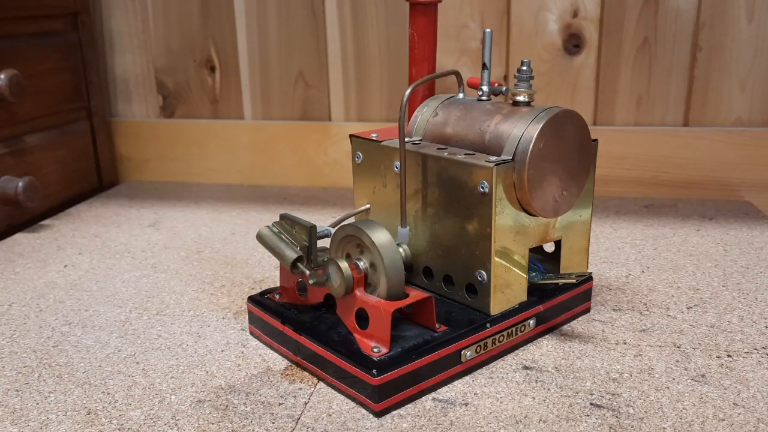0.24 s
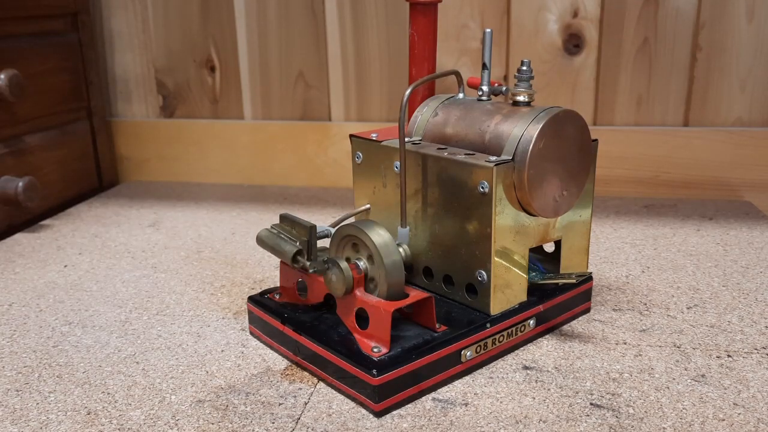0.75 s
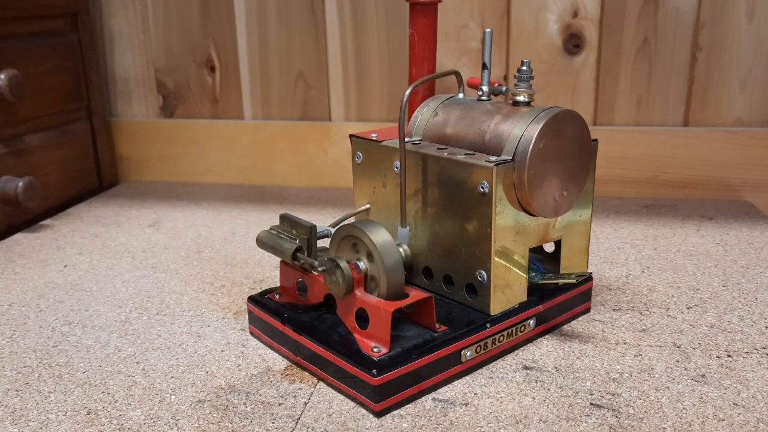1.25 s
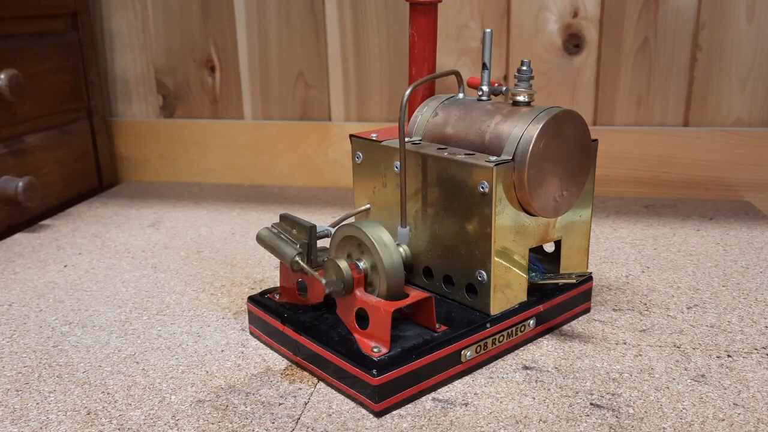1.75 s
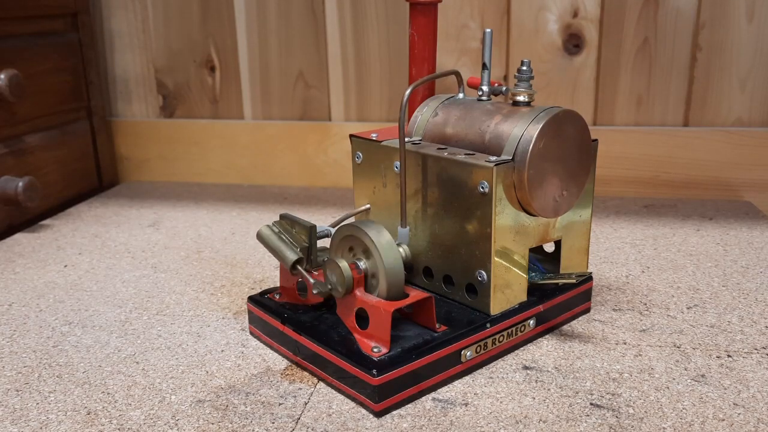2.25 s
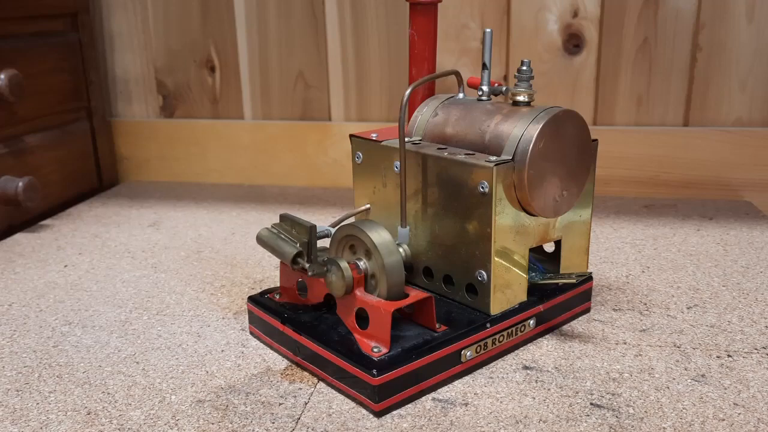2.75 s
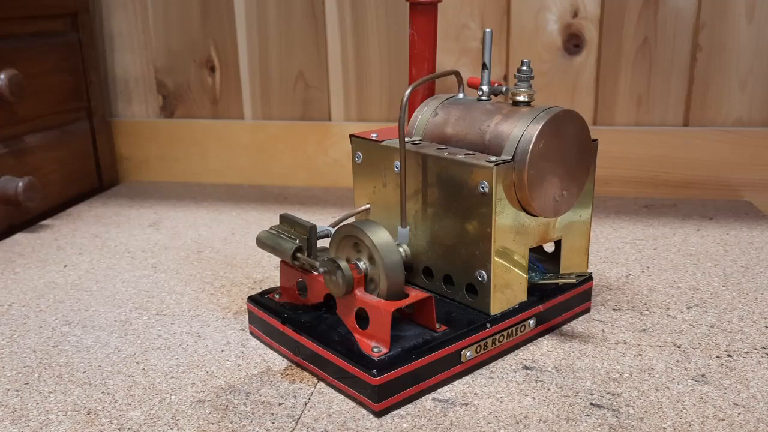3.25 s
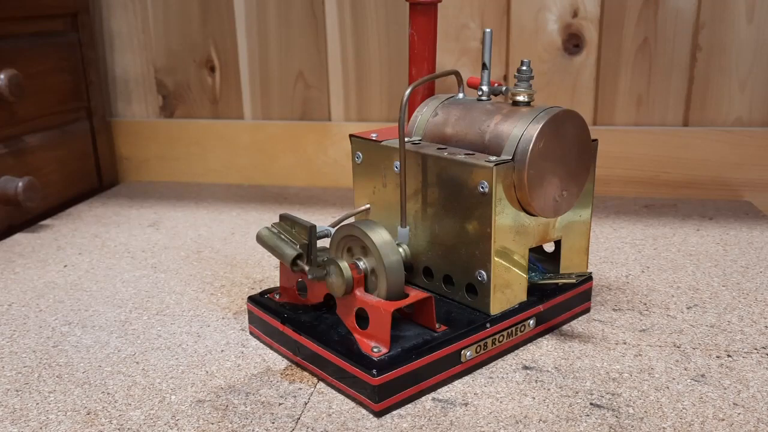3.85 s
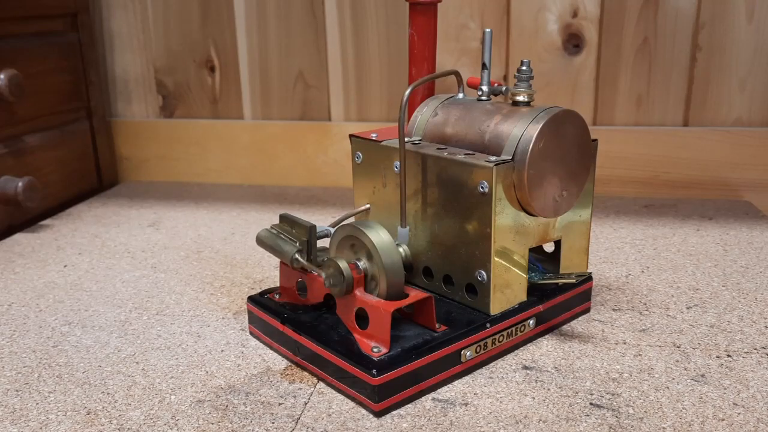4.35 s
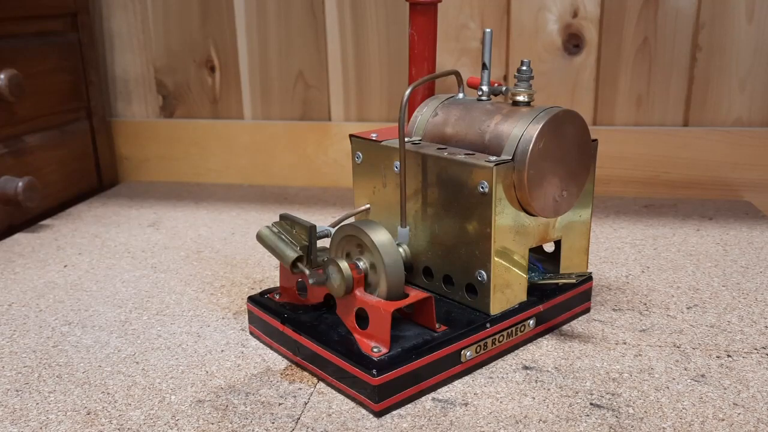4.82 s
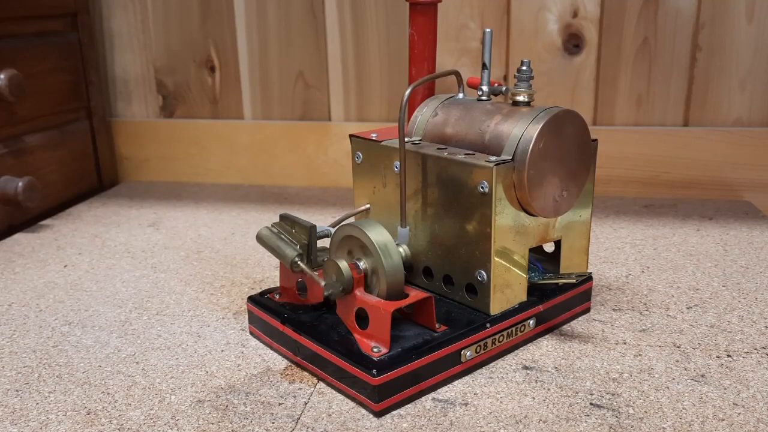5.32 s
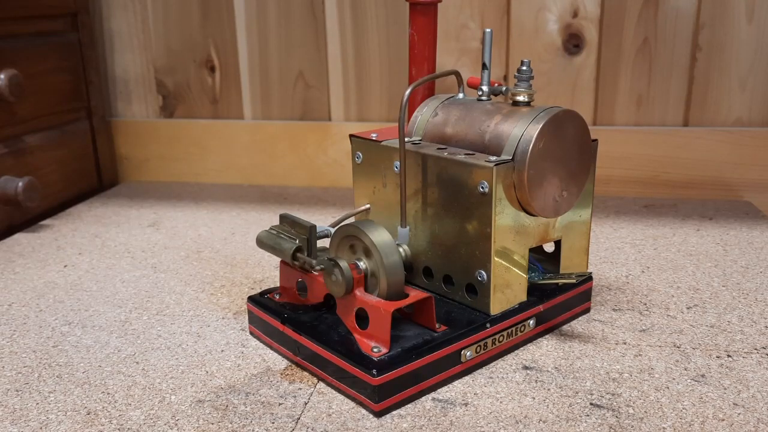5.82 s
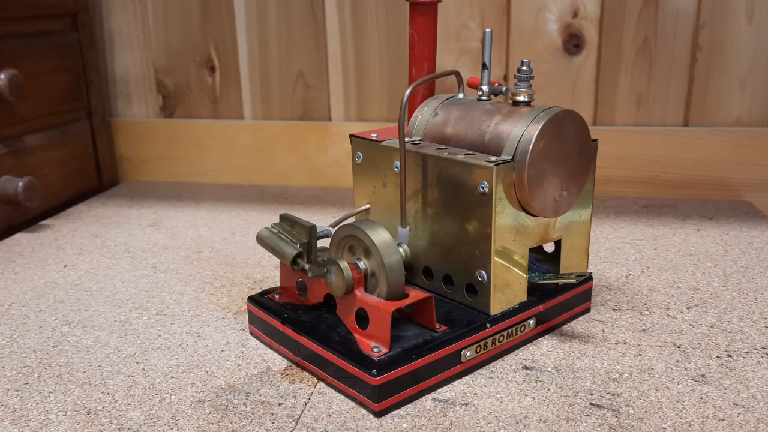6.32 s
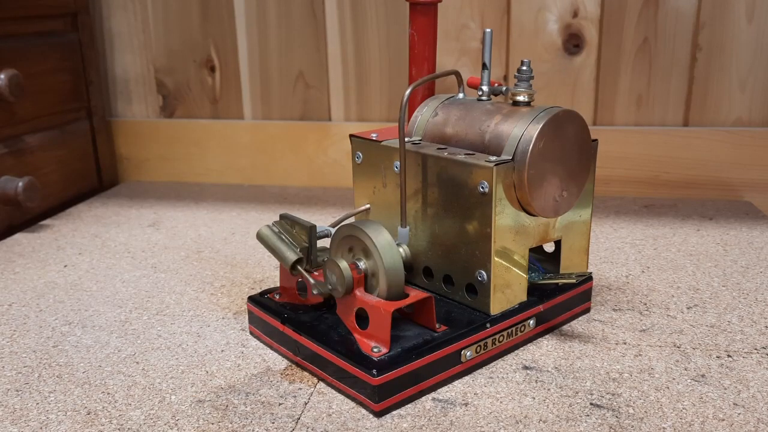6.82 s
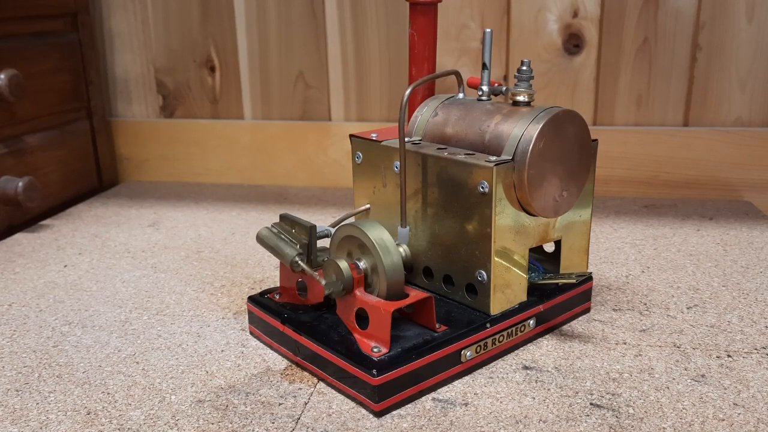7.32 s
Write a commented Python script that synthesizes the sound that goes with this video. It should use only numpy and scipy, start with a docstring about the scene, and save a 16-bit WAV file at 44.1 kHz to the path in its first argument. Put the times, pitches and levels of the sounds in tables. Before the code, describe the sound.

A toy steam engine on a wooden workbench, heard close in a small room. A brief steam rush opens, then soft puffs, a rising breathy whistle and a wet treble spit repeat each turn, from about two to nearly four turns per second. Sizzle, simmering bubbles, dull thumps and irregular sharp pops continue throughout, leaning left in stereo.

```python
"""On a workbench: a toy steam engine warms up and turns over slowly, gathering speed.
Each turn, steam puffs twice through the exhaust pipe (noise through pipe modes), a leak at the rocking
cylinder sings upward (noise around a gliding pitch) and a wet spit follows (treble noise).
Water drops pop on hot metal (noise bursts through body modes), the boiler sizzles and simmers (random
grains, ringing bubbles, dull thumps) and the burner flutters below (low noise)."""
import sys
import numpy as np
from scipy import signal
from scipy.fft import rfft, irfft, next_fast_len
from scipy.io import wavfile
from scipy.ndimage import map_coordinates

SR = 44100
rng = np.random.default_rng(int(sys.argv[2]) if len(sys.argv) > 2 else 0)


def inscribe(sig):
    """Save sig as 16-bit PCM at rate SR to the path in sys.argv[1].

    A 1-D sig is mono; a 2-D sig holds one channel per row.
    Samples are clipped to [-1, 1] before scaling.
    """
    pcm = np.round(np.clip(np.atleast_2d(sig).T, -1, 1) * 32767)
    wavfile.write(sys.argv[1], SR, pcm.astype(np.int16))


N = 333837
TIME = np.arange(N) / SR   # s
PADDED = 2 * next_fast_len(N // 2 + SR // 8)   # samples, with room for filter tails
HZ = np.arange(PADDED // 2 + 1) * SR / PADDED

# flywheel turns, start as the exhaust opens: start_s, first_puff_db, leak_db, spit_db
TURNS = [(-0.27, 0, 3, 13.5), (0.148, -3, -1, 7), (0.578, -5.5, -1, 5), (0.987, -9, -0.5, 6),
         (1.398, -10.5, 0, 4), (1.807, -6, -1, -4), (2.209, -7.5, -2, 6), (2.61, -10, -2.5, 2),
         (3.002, -9.5, -0.5, 5), (3.385, -9.5, 1.5, 4), (3.756, -15, -3.5, 4), (4.096, -3, 1.5, 5.5),
         (4.437, -13, -2, 8), (4.755, -11.5, 0, 8), (5.059, -12, -2, 3), (5.363, -13, -6, 4),
         (5.664, -12, -1.5, 7), (5.957, -9, 0, 8), (6.241, -12, -2.5, 3), (6.522, -8.5, 0, 5.5),
         (6.803, -12, 2, 7), (7.088, -3.5, -0.5, 5), (7.367, -4, -0.5, -3)]
# odd quarter-wave modes of the exhaust pipe: pitch_hz, width_hz, level_db
PIPE_MODES = [(1263, 233, -1), (3681, 360, -4), (6160, 105, 1)]
# drops popping on hot metal, bands relative to level_db:
# start_s, level_db, low_db, middle_db, top_db, left_right_db
POPS = [(0.073, -43, -12.5, -21, -23, 15), (0.381, -34.5, -17, 1.5, 3.5, 8),
        (0.692, -36, -11.5, -4, -4, 13), (0.727, -34.5, -6, -1.5, -3, 10.5), (0.914, -47.5, -3, 6, 10, 5),
        (0.952, -49.5, -2, 7.5, 6.5, 8), (1.097, -26.5, -12, -4, -5, 11.5), (1.106, -32, -11, -8, -5.5, 7),
        (1.317, -31, -14, -4, -4, 4.5), (1.467, -24.5, -14, -13.5, -14, 9.5),
        (1.479, -37, -7.5, 3.5, 0, 14), (1.564, -36.5, -11.5, -4, -3.5, 9),
        (1.858, -18, -11, -3.5, -4.5, 8.5), (2.214, -27.5, -21, -15, -13, 14),
        (2.246, -36.5, -14, -21, -21, 9), (2.306, -38, -17, -10, -11, 16.5),
        (2.366, -30.5, -19, -14, -14, 7), (2.712, -37.5, -12, -7.5, -8.5, 11),
        (2.849, -27.5, -16, -8.5, -7, 8), (2.868, -25, -15, -10, -9.5, 10), (2.889, -37, -15, -10, -10, 8),
        (2.949, -40.5, -11.5, -10, -9, 9), (3.205, -41.5, -7, -0.5, -3.5, 12),
        (3.241, -36, -26, -9.5, -8, 6.5), (3.425, -34.5, -11.5, -8, -11, 11),
        (3.552, -30.5, -24, -16.5, -15, 11), (3.847, -19.5, -15.5, -8.5, -10.5, 13),
        (3.898, -33, -11, -11, -14, 8), (4.034, -18.5, -9.5, -3.5, -3.5, 10),
        (4.114, -36, -13, -9, -8.5, 8), (4.168, -33.5, -18, -9, -7, 7),
        (4.557, -25.5, -19, -10.5, -10, 8.5), (4.764, -31.5, -19, -12.5, -12.5, 5),
        (4.935, -27, -15, -10.5, -11, 11), (5.067, -28.5, -18, -10.5, -9, 9),
        (5.526, -29, -17, -9.5, -10, 13), (5.555, -40, -13, -11, -16, 5),
        (5.713, -30.5, -11, -5.5, -3.5, 9), (5.8, -36.5, -14.5, -10, -10.5, 7),
        (5.881, -34, -14.5, -7.5, -7, 12.5), (6.173, -30, -13, -6, -5, 7.5),
        (6.606, -25, -30.5, -19, -22, 13), (6.866, -39.5, -17, -21, -18, 10),
        (6.887, -27, -17.5, -14.5, -18.5, 12), (6.986, -25.5, -6.5, -5.5, -5.5, 9),
        (7.094, -32, -10.5, -25, -28, 5), (7.201, -35.5, -9, -5.5, -7, 9),
        (7.237, -23.5, -13.5, -5.5, -4, 8), (7.293, -41, -10.5, -14, -18, 2),
        (7.351, -32.5, -6, -7.5, -10.5, 10), (7.507, -29, -23.5, -19, -19, 20)]
# big bubbles bursting in the boiler: start_s, level_db, pitch_hz
GLUGS = [(0.072, -28.5, 760), (0.725, -36, 560), (1.462, -46, 530), (1.856, -34, 736), (2.364, -35, 626),
         (2.428, -40, 323), (2.465, -37, 348), (3.422, -33, 560), (3.844, -32, 320), (3.957, -40.5, 372),
         (4.031, -29.5, 322), (4.215, -39, 332), (4.332, -46, 666), (4.692, -32, 630), (4.934, -33, 331),
         (5.369, -36.5, 527), (5.655, -35.5, 320), (6.405, -34.5, 334), (6.804, -38, 766),
         (6.866, -26, 720), (6.984, -23.5, 780), (7.091, -27.5, 690), (7.18, -36, 365), (7.235, -33, 600),
         (7.396, -30, 790)]
# thumps of the bumping water: start_s, level_db
THUMPS = [(0.13, -65), (0.495, -54.5), (1.37, -59), (1.422, -56), (2.31, -57), (2.424, -51.5), (2.622, -57),
          (3.72, -55), (3.85, -54.5), (3.89, -46.5), (4.032, -43.5), (4.213, -47.5), (4.329, -56.5),
          (4.585, -54), (4.71, -54), (5.03, -60), (5.141, -55), (5.3, -51.5), (5.437, -50), (5.56, -52.5),
          (5.87, -61), (6.17, -63), (6.32, -61), (6.43, -50), (6.63, -57), (6.803, -56)]
# resonances of boiler and firebox: pitch_hz, width_hz, level_db
BODY_MODES = [(687, 130, -6.5), (815, 86, -7), (1338, 98, 6), (2025, 515, 6.5), (2700, 760, -15),
              (3540, 450, -20), (4700, 570, -4.5), (6130, 940, -0.5), (7690, 870, 4.5), (9660, 2400, 6),
              (11600, 2200, -5.5), (15400, 1100, -14)]
# low modes of the hollow base: pitch_hz, width_hz, level_db
BASE_MODES = [(113, 83, 2), (320.5, 23, 1)]
# noise colour of the exhaust rush: freq_hz, level_db_per_hz
RUSH_COLOUR = [(150, -15), (300, -3), (700, 5), (1000, 0.5), (1800, -1), (2500, -5.5), (4500, 1),
               (5300, -2), (7300, 1.5), (9300, -12.5), (11500, -5), (16000, -3.5)]
# noise colour of the wet spit: freq_hz, level_db_per_hz
SPRAY_COLOUR = [(4000, -32.5), (9300, -23.5), (11000, -19.5), (12000, -16.5), (13000, -11.5), (15000, -4.5),
                (16000, -17)]
# noise colour of the sizzle: freq_hz, level_db_per_hz
SIZZLE_COLOUR = [(1000, -21), (2800, -18), (5000, -7), (6300, -4.5), (7800, -2.5), (9300, -14.5),
                 (11000, -4), (13000, -1), (15300, 2.5), (16000, 0)]
# noise colour of the simmer: freq_hz, level_db_per_hz
SIMMER_COLOUR = [(100, -19), (230, -19), (330, -2.5), (430, -1), (750, 3.5), (980, -8.5), (1280, 3),
                 (1550, -18), (1950, -7.5), (2500, -60), (5000, -47)]
# noise colour of the flame: freq_hz, level_db_per_hz
BURNER_COLOUR = [(20, -31), (40, -24), (65, -5), (95, 4), (140, -3.5), (175, -2), (240, -16), (332, 3),
                 (420, -11), (600, -5), (800, -8), (1000, -26), (1300, -8.5), (2500, -29), (8000, -28)]
# noise colour of the opening steam surge: freq_hz, level_db_per_hz
SURGE_COLOUR = [(200, -9), (600, 2), (1200, 1), (2000, -1.5), (3000, -10.5), (6500, -5.5), (9000, -26),
                (16000, -6)]
# noise colour of the thumps: freq_hz, level_db_per_hz
THUMP_COLOUR = [(30, -24), (60, -10), (95, 3), (130, 0), (180, -5.5), (250, -15), (330, -10.5), (500, -10),
                (1500, -47)]
# level of the left port over the right: freq_hz, left_right_db
PORT_LEAN = [(60, 6), (200, 6.5), (380, 9), (700, 6), (1200, 6), (2400, 10), (3500, 13), (5500, 5.5),
             (7300, 5), (8600, -3.5), (10500, 6.5), (15000, 5)]
# phase by which the left port leads: freq_hz, lead_rad
PORT_PHASE = [(0, 0), (1900, 0.14), (3700, 0.8), (7000, -1.1), (14400, -2.5)]
# likeness of left and right noise: freq_hz, likeness_0_to_1
LIKENESS = [(100, 0.86), (700, 0.4), (1800, 0.6), (3000, 0.07), (5000, 0), (7000, 0.1), (9000, 0.63),
            (15000, 0)]

# crank timing, in shares of a turn: opens_at, attack, hold, release
FIRST_PUFF = (0, 0.029, 0.019, 0.018)
SECOND_PUFF = (0.399, 0.058, 0.025, 0.012)
STROKE = (0.043, 0.035, 0.53, 0)
LEAK = (0.47, 0.033, 0.18, 0.029)
SEEP = (0.16, 0.12, 0.031, 0.071)
SPIT = (0.7355, 0.06, 0.018, 0.0096)
DRIBBLE = (0.56, 0.079, 0.043, 0.023)
DRAW = (0.2, 0.06, 0.39, 0.22)

FIRST_PUFF_DB, SECOND_PUFF_DB, STROKE_DB = 12, -1, -8   # flow through the exhaust pipe
LEAK_DB, SEEP_DB, SPIT_DB, DRIBBLE_DB = -54, -65.5, -52.5, -61.5
LEAK_MID_TURN_HZ, LEAK_RISE_HZ_PER_TURN = 6410, 6730   # pitch climbs as the gap narrows
SEEP_HZ = 7020   # the same gap hisses softly earlier in the stroke
# hotter steam carries sound faster, so the pipe's pitch creeps up
COLD_PIPE_PITCH_RATIO, PIPE_RISE_RATIO_PER_S = 0.96, 0.008
SIMMER_DB, SIMMER_GROWTH_DB_PER_S = -73.5, 0.9056
DRAW_DB = 5   # drawing steam makes the water boil harder
BURNER_DB, BURNER_GROWTH_DB_PER_S = -68.5, 0.68
SURGE_DB, SURGE_HOLD_S, SURGE_RELEASE_S = -50.5, 0.047, 0.15
SNAP_DB = 14   # one-sample click that starts a pop, over unit-power noise
POP_BANDS_HZ = ((50, 2600), (2600, 9000), (9000, 17000))
BASS_CUT_HZ, CUTOFF_HZ = 34, 15850


def from_db(db):
    """Decibels to gain."""
    return 10 ** (np.asarray(db) / 20)


def rms_one(x):
    """Scale to unit power."""
    return x / np.sqrt(np.mean(x ** 2) + 1e-20)


def along(rows, at):
    """Interpolate a table's second column over its first."""
    first, second = np.transpose(rows)
    return np.interp(at, first, second)


def gains(points):
    """Gains on the frequency grid, interpolated in dB over log frequency."""
    hz, db = np.transpose(points)
    return from_db(np.interp(np.log(HZ + 1), np.log(hz), db))


def filtered(x, response):
    """Apply a frequency response."""
    return irfft(rfft(x, PADDED) * response)[..., :N]


def resonance(hz, width_hz):
    """Causal response of one damped mode, gain 1 on top."""
    return 1j * HZ * width_hz / (hz ** 2 - HZ ** 2 + 1j * HZ * width_hz)


def body(modes):
    """Summed response of a set of damped modes."""
    return sum(from_db(db) * resonance(hz, width_hz) for hz, width_hz, db in modes)


def drift(rate_hz):
    """Slow random wander of unit power, falling off above rate_hz."""
    hz = HZ[HZ < 10 * rate_hz]
    spectrum = rng.standard_normal(len(hz)) + 1j * rng.standard_normal(len(hz))
    return rms_one(irfft(spectrum / (1 + (hz / rate_hz) ** 2), PADDED)[:N])


def two_ears(count, response=1):
    """Stereo noise through a response, left and right as alike as LIKENESS sets."""
    alike = np.clip(along(LIKENESS, np.arange(count // 2 + 1) * SR / count), 0, 1)
    mid, side = rfft(rng.standard_normal((2, count)))
    ears = np.sqrt(1 + alike) * mid + np.sqrt(1 - alike) * side * [[1], [-1]]
    return rms_one(irfft(response * ears, count)[:, :N])


def hiss(colour, flutter_db):
    """Turbulent noise whose level flutters."""
    return rms_one(two_ears(PADDED, gains(colour)) * from_db(flutter_db * drift(28)))


def grains(per_s, spread_db):
    """Random single-sample impulses, most weak and a few strong."""
    sizes = from_db(spread_db * np.minimum(rng.exponential(1, N), 3))
    signs = rng.choice([-1, 1], N)
    return rms_one(sizes * signs * (rng.random(N) < per_s / SR))


def crackle(response, per_s, spread_db, decay_s):
    """Tiny drops at random moments, each a noise burst that dies in a few milliseconds."""
    impulses = abs(grains(per_s, spread_db)) + 1e-9
    envelope = signal.lfilter([1], [1, -np.exp(-1 / (decay_s * SR))], impulses)
    return rms_one(filtered(two_ears(PADDED) * envelope, response))


def crank():
    """Index of the current turn and the share of it that has passed."""
    starts = np.array(TURNS)[:, 0]
    edges = np.append(starts, 2 * starts[-1] - starts[-2])
    turns = np.interp(TIME, edges, np.arange(len(edges)))
    return np.minimum(turns.astype(int), len(starts) - 1), turns % 1


def opening(angle, phase):
    """Flow through a port: linear rise, hold, exponential fall."""
    opens, attack, hold, release = phase
    since = (angle - opens) % 1
    rise = np.minimum(since / max(attack, 1e-3), 1)
    return rise * np.exp(-np.maximum(since - attack - hold, 0) / max(release, 1e-3))


def workshop(x, room_db, room_t60_s):
    """A faint decaying noise tail from the wooden walls, different at each ear."""
    t = TIME[:SR // 2]
    tail = rng.standard_normal((2, len(t))) * from_db(-60 * t / room_t60_s) * (t > 0.004)
    tail /= np.linalg.norm(tail[0])
    return x + from_db(room_db) * signal.fftconvolve(x, tail, axes=1)[:, :N]


def burner():
    """Flame turbulence: fluttering low noise that slowly grows."""
    return hiss(BURNER_COLOUR, flutter_db=2) * from_db(BURNER_DB + BURNER_GROWTH_DB_PER_S * TIME)


def surge():
    """A rush of steam at the start that dies away."""
    fall = np.exp(-np.maximum(TIME - SURGE_HOLD_S, 0) / SURGE_RELEASE_S)
    return hiss(SURGE_COLOUR, flutter_db=3) * from_db(SURGE_DB) * fall


def thumps(rise_s, level_db):
    """A pocket of steam swells and collapses under the water: a dull swell of noise."""
    strength, age = np.zeros(N + SR), TIME[:SR // 6] / rise_s
    for start_s, thump_db in THUMPS:
        at = int(start_s * SR)
        strength[at:at + len(age)] += from_db(thump_db + level_db) * age * np.exp(1 - age)
    return strength[:N] * two_ears(PADDED, gains(THUMP_COLOUR))


def glugs(cycles, rise, level_db):
    """A big bubble rings for a few cycles, rising in pitch as it surfaces."""
    out, t = np.zeros(N + SR), TIME[:SR // 12]
    for start_s, glug_db, hz in GLUGS:
        age = t * hz / cycles
        ring = np.exp(-age) * np.sin(2 * np.pi * hz * t * (1 + rise * age))
        at = int(start_s * SR)
        out[at:at + len(t)] += from_db(glug_db + level_db) * ring
    return out[:N]


def simmer(angle):
    """Ticks on the shell and small bubbles, both stronger while steam is drawn."""
    ticks = from_db(-72) * crackle(body(BODY_MODES), per_s=18, spread_db=2, decay_s=0.0017)
    bubbles = crackle(gains(SIMMER_COLOUR), per_s=80, spread_db=2, decay_s=0.0039)
    bubbles = bubbles * from_db(SIMMER_DB + SIMMER_GROWTH_DB_PER_S * TIME)
    return (ticks + bubbles) * from_db(DRAW_DB * opening(angle, DRAW))


def sizzle():
    """Steady frying hiss with fine fizz on the hot shell."""
    fizz = crackle(gains(SIZZLE_COLOUR), per_s=40, spread_db=3.5, decay_s=0.0015)
    frying = hiss(SIZZLE_COLOUR, flutter_db=2.4)
    return from_db(-57) * frying + from_db(-70.5) * fizz


def boiler(angle):
    """Sizzle on the shell, bubbling water inside, the flame beneath."""
    water = simmer(angle) + glugs(cycles=3.44, rise=0.027, level_db=-14) + thumps(rise_s=0.011, level_db=-5)
    return sizzle() + water + surge() + burner()


def burst(decay_s, tail_db, tail_s):
    """Noise with a fast decay and a weaker, longer tail."""
    t = TIME[:SR // 10]
    return two_ears(len(t)) * (np.exp(-t / decay_s) + from_db(tail_db) * np.exp(-t / tail_s))


def pops():
    """Drops flash to steam and ring the boiler, each with its own thud, snap and spray."""
    out = np.zeros((2, N + SR))
    shell, base = irfft([body(BODY_MODES), body(BASE_MODES)])[:, None, :SR // 20]
    bands = [signal.butter(2, edges, "band", fs=SR, output="sos") for edges in POP_BANDS_HZ]
    for start_s, pop_db, *band_db, left_right_db in POPS:
        flash = burst(decay_s=0.0028, tail_db=-22, tail_s=0.014)
        flash[:, 0] += from_db(SNAP_DB)
        crack = signal.fftconvolve(flash, shell, axes=1)
        pop = np.zeros_like(crack)
        for db, sos in zip(band_db, bands):
            part = signal.sosfilt(sos, crack)
            pop += from_db(pop_db + db + 27) * part / np.linalg.norm(part)
        # the hollow base answers with a longer, duller knock
        knock = signal.fftconvolve(burst(decay_s=0.022, tail_db=-7, tail_s=0.071), base, axes=1)
        pop += from_db(pop_db + band_db[0] + 13) * knock / np.linalg.norm(knock)
        # record() leans left too: 10 dB is taken off here to allow for it
        pan = from_db(np.array([[1], [-1]]) * (left_right_db - 10) / 2)
        at = int(start_s * SR)
        out[:, at:at + pop.shape[1]] += pop * pan
    return out[:, :N]


def spit(angle, spit_db):
    """Wet treble spray late in the turn, led by a weaker dribble."""
    wet = from_db(SPIT_DB) * opening(angle, SPIT) + from_db(DRIBBLE_DB) * opening(angle, DRIBBLE)
    return hiss(SPRAY_COLOUR, flutter_db=3) * from_db(spit_db) * wet


def whistle(hz, width_hz):
    """Breathy whistle: a band of noise shifted to a gliding pitch."""
    band = filtered(rng.standard_normal((2, N)), 1 / (1 + (HZ / width_hz) ** 2) ** 2)
    blended = band + 0.35 * band[::-1]
    return rms_one(blended * np.cos(2 * np.pi * np.cumsum(hz) / SR))


def cylinder_leak(angle, leak_db):
    """Steam through a narrowing gap sings upward; water in it makes level and pitch waver."""
    sputter = from_db(2.8 * drift(90))
    waver_hz = 170 * drift(35)
    song_hz = LEAK_MID_TURN_HZ + LEAK_RISE_HZ_PER_TURN * (angle - 0.5) + waver_hz
    leak = whistle(song_hz, width_hz=950) * from_db(LEAK_DB + leak_db) * opening(angle, LEAK)
    seep_flow = opening(angle, SEEP) + from_db(4.5) * opening(angle, SPIT)
    seep = whistle(np.full(N, SEEP_HZ), width_hz=1600) * from_db(SEEP_DB) * seep_flow
    return sputter * (leak + seep)


def exhaust(angle, puff_db):
    """Steam rushes out in two puffs and a weaker stroke, sounding the pipe's modes."""
    puffs = from_db(FIRST_PUFF_DB + puff_db) * opening(angle, FIRST_PUFF)
    puffs = puffs + from_db(SECOND_PUFF_DB) * opening(angle, SECOND_PUFF)
    stumble = from_db(2.2 * drift(22))   # water in the steam
    stroke = stumble * from_db(STROKE_DB) * opening(angle, STROKE)
    modes = sum(from_db(db) * abs(resonance(hz, width_hz)) ** 2 for hz, width_hz, db in PIPE_MODES)
    # read the noise ever faster to raise its pitch
    read_at = np.cumsum(COLD_PIPE_PITCH_RATIO + PIPE_RISE_RATIO_PER_S * TIME)
    ears = two_ears(PADDED, modes)
    pipe = rms_one(np.array([map_coordinates(ear, [read_at], mode="mirror") for ear in ears]))
    rush = hiss(RUSH_COLOUR, flutter_db=3) * (from_db(-7) * puffs + stroke)
    return from_db(-57) * pipe * (puffs + from_db(-2.5) * stroke) + from_db(-54.5) * rush


def engine(turn, angle):
    """The crank opens the ports in order: two puffs, a rising whistle, a wet spit."""
    _, puff_db, leak_db, spit_db = np.array(TURNS)[turn].T
    return spit(angle, spit_db) + cylinder_leak(angle, leak_db) + exhaust(angle, puff_db)


def scene():
    """Boiler, pops and engine in one small machine, with the room's tail."""
    turn, angle = crank()
    machine = boiler(angle) + pops() + engine(turn, angle)
    return workshop(machine, room_db=-11, room_t60_s=0.31)


def record(dry):
    """Two ports: left mostly louder, its phase ahead below 5 kHz, behind above; bass and top cut."""
    lean = np.sqrt(gains(PORT_LEAN))
    bass_cut = 1j * HZ / (1j * HZ + BASS_CUT_HZ)
    left = lean * np.exp(1j * along(PORT_PHASE, HZ))
    ports = bass_cut * np.array([left, 1 / lean])
    top_cut = signal.ellip(10, 0.2, 70, CUTOFF_HZ, fs=SR, output="sos")
    return signal.sosfilt(top_cut, filtered(dry, ports))


dry = scene()
out = record(dry)
inscribe(out)
```